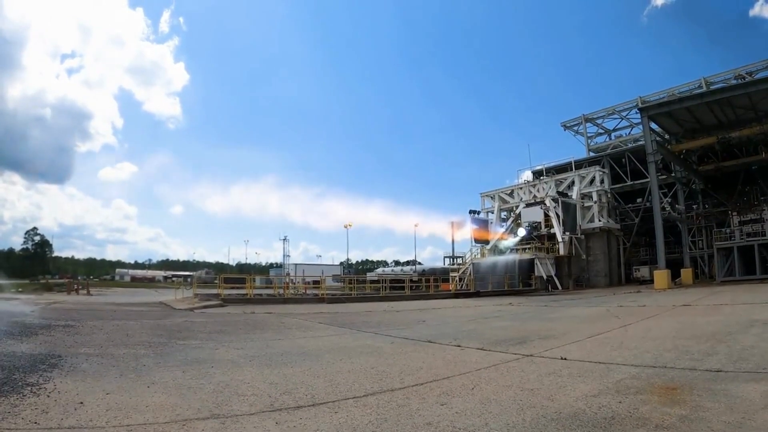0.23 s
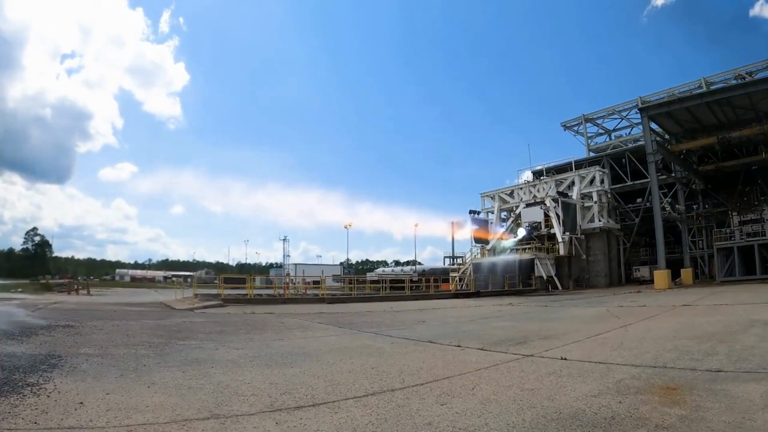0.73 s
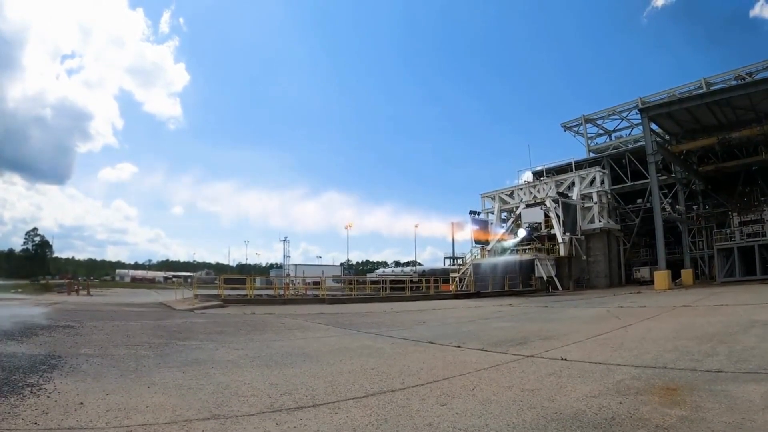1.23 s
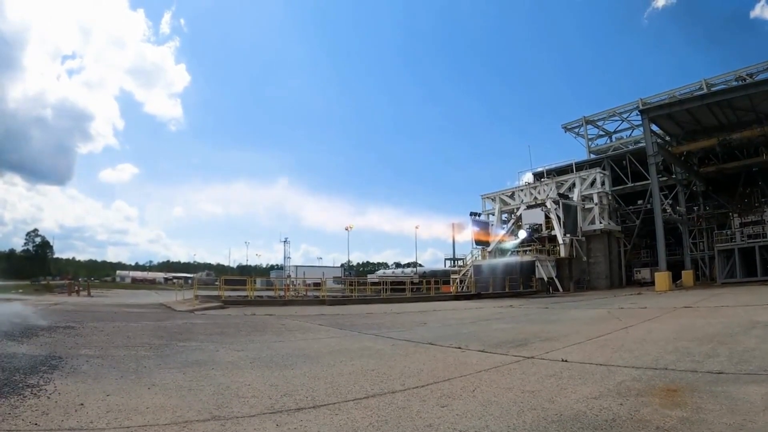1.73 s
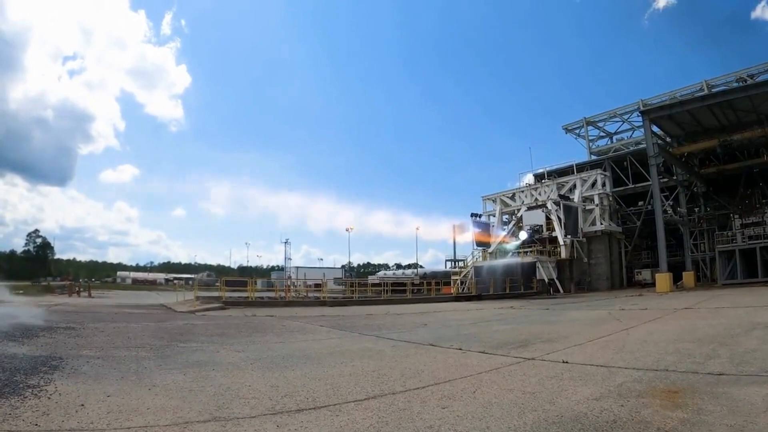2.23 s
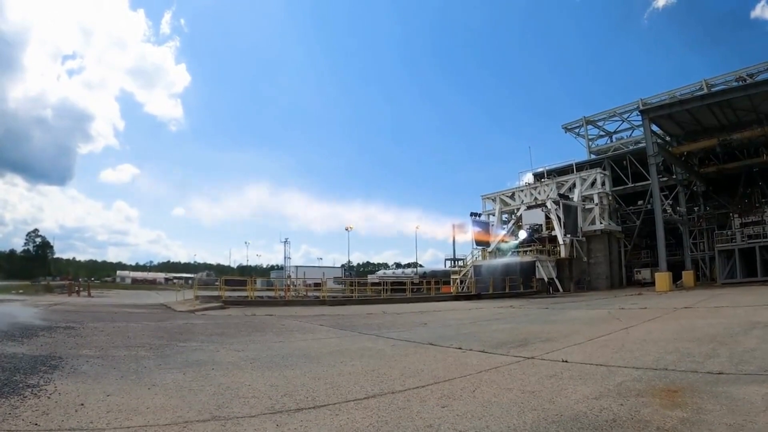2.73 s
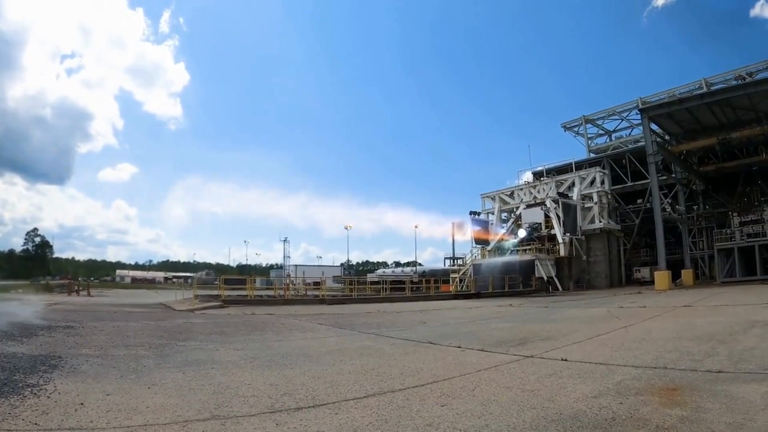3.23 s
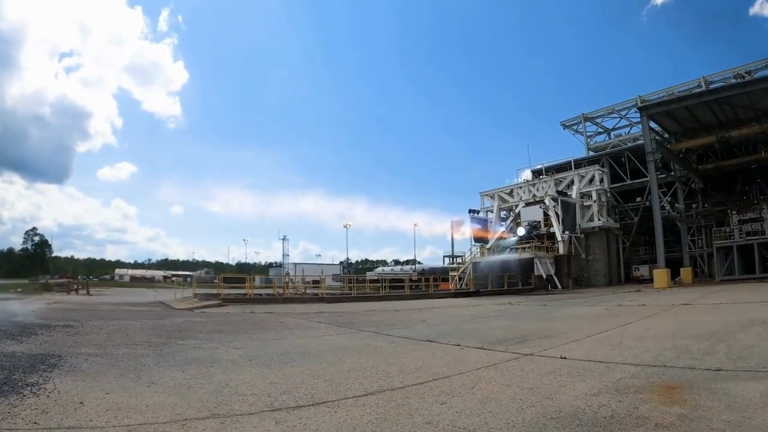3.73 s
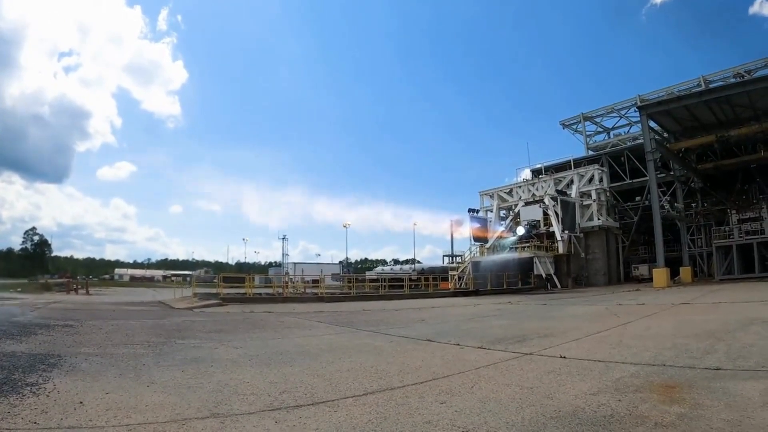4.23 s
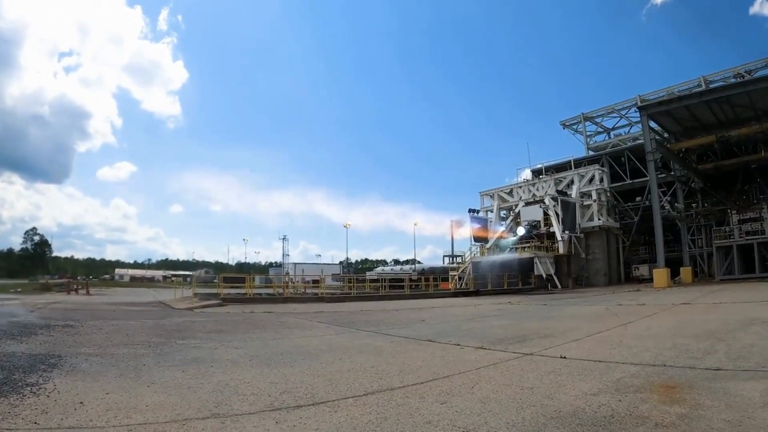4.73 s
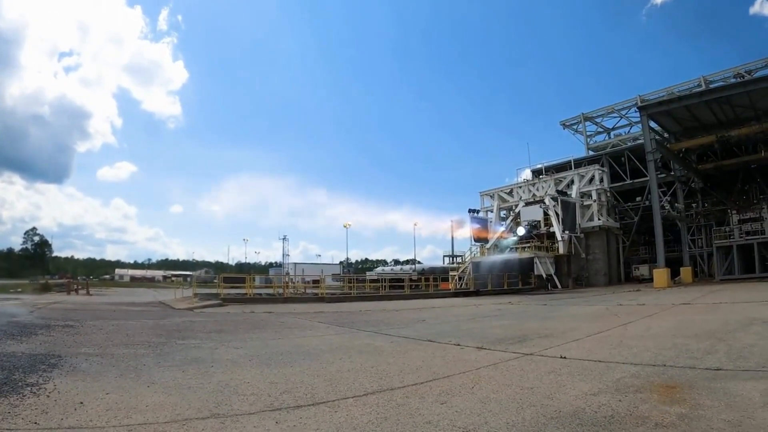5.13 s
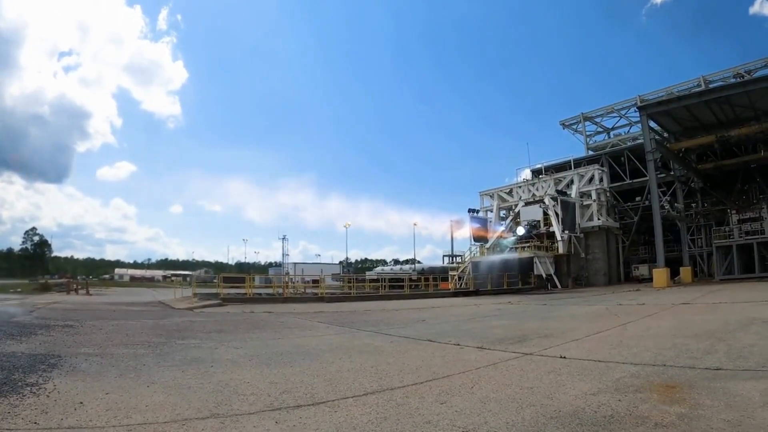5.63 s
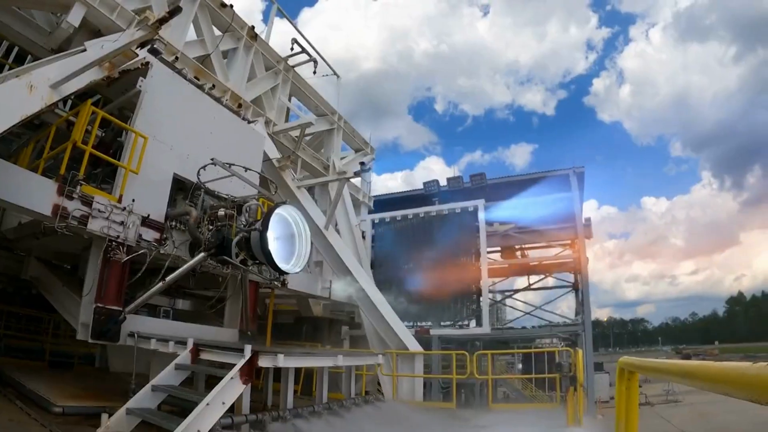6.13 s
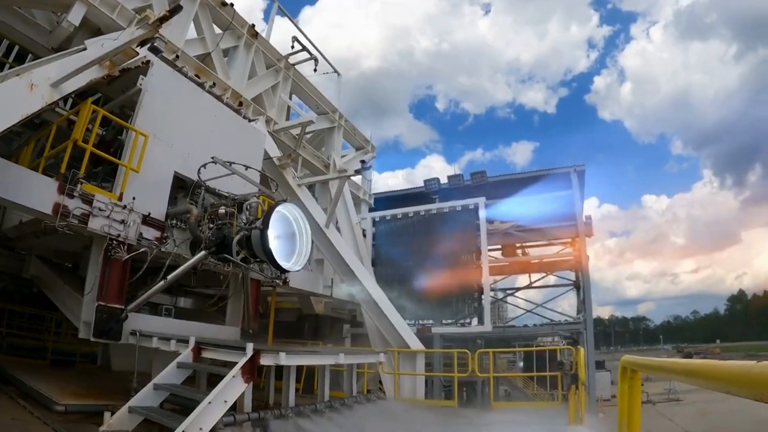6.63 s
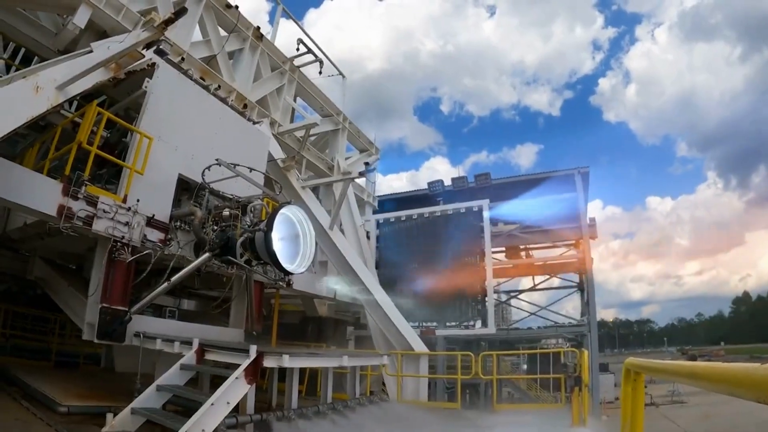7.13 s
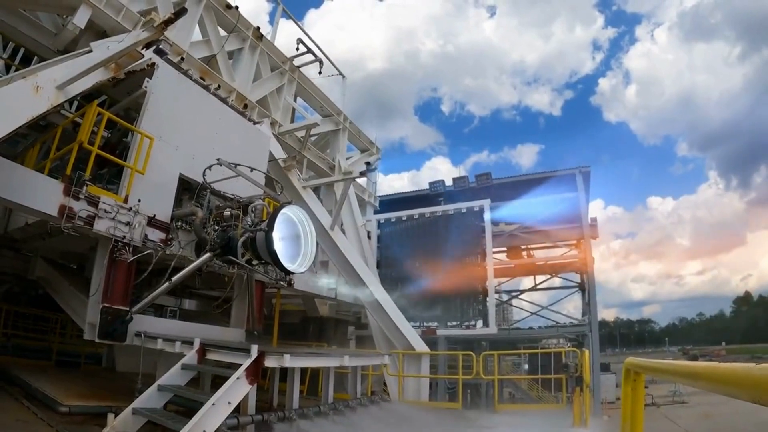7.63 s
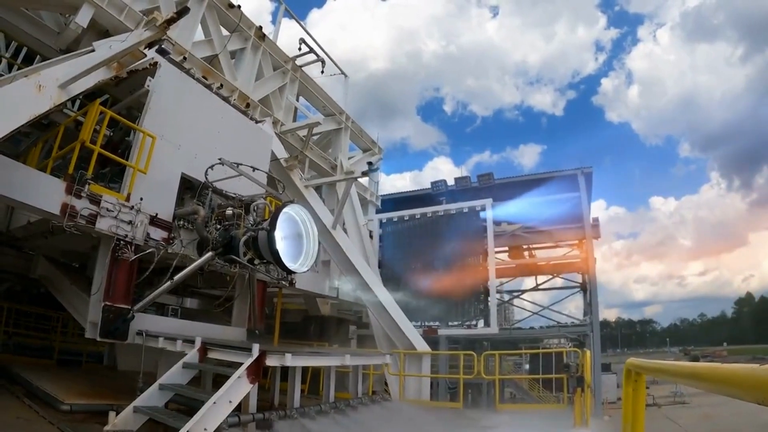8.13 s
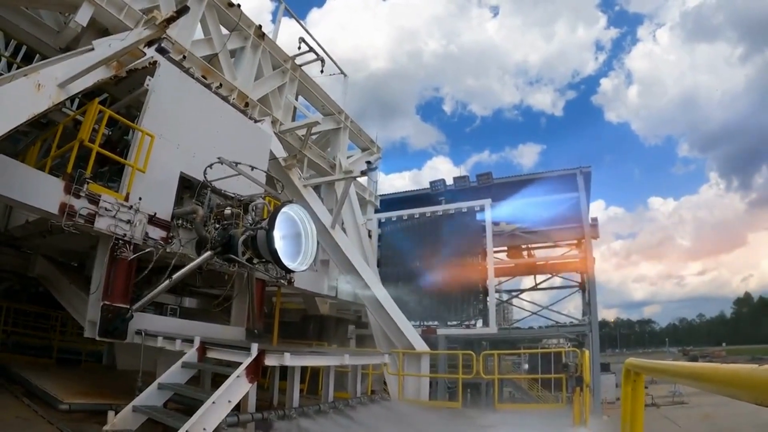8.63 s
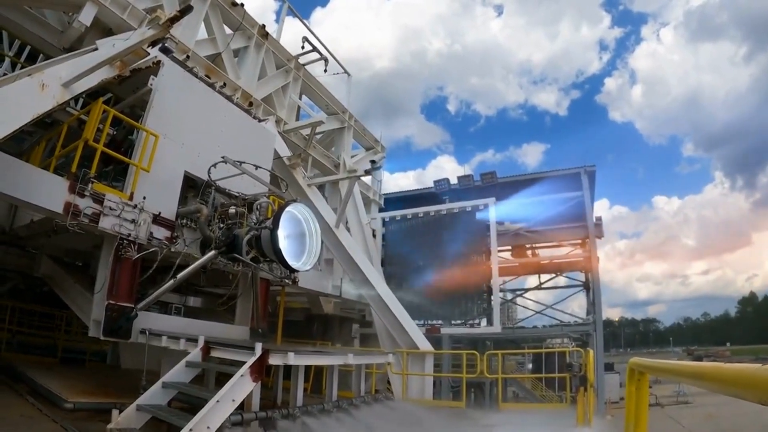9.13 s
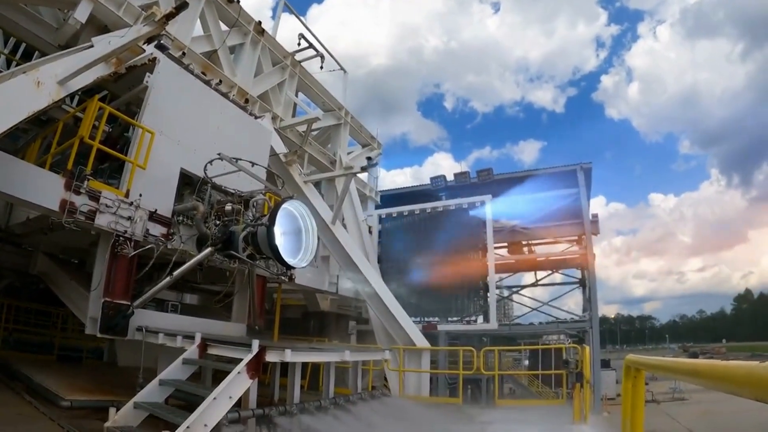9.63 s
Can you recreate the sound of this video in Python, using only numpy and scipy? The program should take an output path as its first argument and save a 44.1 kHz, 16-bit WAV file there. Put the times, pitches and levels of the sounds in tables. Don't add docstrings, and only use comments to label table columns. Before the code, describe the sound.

Unbroken rocket thrust outdoors, heard from two housed camera microphones. First, across a concrete apron, dense bassy thunder drives the microphone into distortion, its weak hiss fluttering in quick crackling bursts and lulls. At about 5.8 seconds the sound clicks and switches instantly to a near position: still deep, but with a full harsh rushing blast, even and dense, with little crackle and no fade.

```python
import sys
import numpy as np
from scipy import signal
from scipy.fft import rfft, irfft, next_fast_len
from scipy.io import wavfile
from scipy.ndimage import uniform_filter1d

SR = 44100
rng = np.random.default_rng(int(sys.argv[2]) if len(sys.argv) > 2 else 0)


def int16_out(signal):
    q = np.round(np.clip(np.atleast_2d(signal).T, -1, 1) * 32767)
    wavfile.write(sys.argv[1], SR, q.astype(np.int16))


def ratio(d):
    e = np.asarray(d, float) / 20
    return 10 ** e


N = 435708

CUT_S, CUT_JUMP = 5.83493, -.24
HISS_FROM_HZ = 1500
RUN_IN = 8192
FAR_LEVEL_DB, NEAR_LEVEL_DB = -11, -13.5
BURST_S, LULL_S = .018, .025
ROAR_FOLLOWS = 0.021
EDDIES_PER_S = 18.
CEILING_BAND_HZ, CEILING_RAGGED_HZ = 280, 800

# frequency [Hz], density [dB per Hz].
FAR_PLUME = [(20, -12), (80, -3.5), (200, -5), (500, -21.5), (1200, -35.5), (3000, -43.5), (6000, -54),
             (15000, -54.5)]
NEAR_PLUME = [(20, -9.5), (70, -12), (170, -4.5), (320, -22.5), (500, -31), (1300, -23.5), (3000, -13.5),
              (15000, -23.5)]
# frequency [Hz], density [dB per Hz].
FAR_HEARD = [(12, -45), (22, -17.5), (45, -5.5), (75, 0.5), (180, -2.5), (280, -7.5), (500, -10),
             (1000, -22), (1750, -35.5), (2500, -34.5), (3200, -42), (5200, -53.5), (8200, -70),
             (15600, -69)]
NEAR_HEARD = [(12, -35), (22, -14.5), (70, -2), (170, -2), (320, -5), (365, -9.5), (520, -14), (1250, -9.5),
              (2700, -14), (3450, -22.5), (3900, -31), (5500, -35.5), (8500, -59), (15600, -66)]
# centre [Hz], width [Hz], gain [dB].
FAR_CAVITY = [(4020, 860, 8), (6700, 700, 2.5), (12200, 600, 5), (13800, 1600, 2)]
NEAR_CAVITY = [(667, 39, 2), (797, 40, -2.5), (866, 25, 0.5), (2324, 156, -4.5), (10060, 1930, 6.5),
               (12350, 1000, -1)]
# frequency [Hz], lag [ms].
HOUSING_LAG = [(30, 1.7), (150, 2.4), (300, 1.8), (570, 1.36), (1100, .7), (2000, .25), (3500, 0)]
# time [s], swell [dB].
BURSTS = [(.07, 4), (.14, 5.5), (.61, 9.5), (.70, 13.5), (.92, 7.5), (1.15, 6), (1.27, 2.5), (1.37, 7),
          (1.53, -1), (1.80, 10), (1.91, 10), (1.97, 2.5), (2.22, 3), (2.30, 5), (2.36, 9.5), (2.48, 11),
          (2.81, 3.5), (3.00, 6.5), (3.13, 9), (3.26, 8), (3.31, 6.5), (3.67, 6), (3.92, 11), (4.07, 6),
          (4.32, 3), (4.47, 5), (4.60, 2.5), (4.67, 7), (5.02, 7.5), (5.77, 3.5)]
# time [s], sag [dB].
LULLS = [(.10, -7.5), (.53, -9.5), (.82, -7), (.98, -4), (1.46, -14.5), (1.86, -2), (2.02, -8),
         (2.53, -8.5), (2.68, -7), (2.74, -10), (2.84, -7), (3.07, -4.5), (3.39, -8), (3.61, -6),
         (3.98, -10), (4.22, -3), (4.54, -13), (4.75, -6), (4.90, -6), (4.99, -10.5), (5.22, -2),
         (5.40, -6.5), (5.66, -12.5), (5.73, -11.5)]
# frequency [Hz], power share [0-1].
CAMERA_BLUR = [(300, 0), (600, .15), (1100, .25), (2000, .07), (4000, .05), (6500, .55), (9000, .75)]
# low edge [Hz], high edge [Hz], chance [0-1].
FAR_STARVED = [(6900, 7600, .02), (7600, 8300, .05), (8300, 8900, .09), (8900, 9600, .03),
               (9600, 10300, .04), (10300, 11200, .04)]
NEAR_STARVED = [(9900, 10600, .1), (10600, 11200, .68), (11300, 11600, .45), (11600, 11900, .4),
                (11900, 12300, .3), (12300, 12700, .2)]
# time [s], ceiling [Hz].
FAR_CEILING = [(0, 15900)]
NEAR_CEILING = [(5.84, 13500), (6.6, 14000), (7.2, 13000), (7.7, 13600), (8.1, 14900), (8.5, 13600),
                (8.7, 12600), (9.0, 13500)]
# frequency [Hz], level [dB rms].
WHINE = [(11254, -86)]


def rms_one(x):
    return x / np.sqrt(np.mean(x ** 2))


def at_hz(points, hz):
    point_hz, value = np.transpose(points)
    return np.interp(np.log(np.maximum(hz, 1)), np.log(point_hz), value)


def gusts(events, half_s, first, count):
    at = np.arange(0, count, 64)
    t = (first + at) / SR
    bells = np.zeros(len(t))
    for s, db in events:
        bells += db * np.exp(-((t - s) / half_s) ** 2)
    return np.interp(np.arange(count), at, bells)


def drift(rate_hz, count):
    r = np.exp(-2 * np.pi * rate_hz / SR)
    noise = rng.standard_normal(count + SR)
    return rms_one(signal.lfilter([1], [1, -2 * r, r * r], noise)[SR:])


def shocklets(per_s, decay_ms, count):
    size_db = 4.6 * np.minimum(rng.exponential(1, count), 4)
    jumps = (rng.random(count) < per_s / SR) * ratio(size_db)
    sag = np.exp(-1000 / (decay_ms * SR))
    return rms_one(signal.lfilter([1], [1, -sag], jumps - jumps.mean()))


def plume(spectrum, gust_db, crackle_db):
    count = len(gust_db)
    hz = np.arange(count // 2 + 1) * SR / count
    noise = rfft(rng.standard_normal(count)) * ratio(at_hz(spectrum, hz))
    rumble = irfft(noise * (hz <= HISS_FROM_HZ), count)
    hiss = irfft(noise * (hz > HISS_FROM_HZ), count)
    crackle = ratio(crackle_db) * np.std(hiss) * shocklets(per_s=350., decay_ms=0.11, count=count)
    return rms_one(rumble + ratio(gust_db) * (hiss + crackle))


def steepen(pressure, steepen_ms):
    at = np.arange(len(pressure))
    return np.interp(at + pressure * steepen_ms * SR / 1000, at, pressure)


def capsule(pressure, drive, lean, knee):
    swing = drive * pressure + lean
    return swing / (1 + np.abs(swing) ** knee) ** (1 / knee)


def housing(x, heard, cavity):
    hz, power = signal.welch(x, SR, nperseg=4096)
    edges = np.geomspace(15, SR / 2, 40)
    sums = np.interp(edges, hz, np.cumsum(power))
    centres = np.sqrt(edges[1:] * edges[:-1])
    own_db = np.c_[centres, 10 * np.log10(np.diff(sums) / np.diff(edges))]

    hz = np.arange(len(x) // 2 + 1) * SR / len(x)
    gain_db = at_hz(heard, hz) - at_hz(own_db, hz)
    for centre, width, db in cavity:
        gain_db += db * np.exp(-((hz - centre) / width) ** 2)
    lag_s = at_hz(HOUSING_LAG, hz) / 1000
    phase = np.pi / 2 - 2 * np.pi * np.cumsum(lag_s) * hz[1]
    return irfft(rfft(x) * ratio(gain_db) * np.exp(1j * phase), len(x))


def gain_control(x, top):
    held = uniform_filter1d(np.abs(x), size=400)
    return x / np.sqrt(1 + (held / top) ** 2)


def camera_smear(x, starved, ceiling, start_s):
    hz, s, frames = signal.stft(x, SR, nperseg=2048)
    share = np.clip(at_hz(CAMERA_BLUR, hz), 0, 1)[:, None]
    power = np.abs(frames) ** 2
    steady = np.median(power, axis=1, keepdims=True) / np.log(2)
    height = np.sqrt(0.16 * power + 0.28 * steady)
    turns = np.exp(2j * np.pi * rng.random(frames.shape))
    frames = np.sqrt(1 - share) * frames + np.sqrt(2 * share) * height * turns

    for low_hz, high_hz, chance in starved:
        dropped = np.repeat(rng.random(len(s)) < chance, 2)[:len(s)]
        frames[np.ix_((hz > low_hz) & (hz <= high_hz), dropped)] = 0

    band = (hz // CEILING_BAND_HZ).astype(int)
    ragged = np.repeat(rng.standard_normal((band[-1] + 1, len(s))), 2, axis=1)[band, :len(s)]
    reach_hz = np.interp(start_s + s, *np.transpose(ceiling)) + CEILING_RAGGED_HZ * ragged
    frames[(band * CEILING_BAND_HZ)[:, None] > reach_hz] = 0
    return signal.istft(frames, SR, nperseg=2048)[1][:len(x)]


def listening_post(first, count, level_db, spectrum, heard, cavity, starved, ceiling, crackle_db,
                   steepen_ms, drive, lean, knee, flutter_db, eddy_db, top):
    size = next_fast_len(count + 2 * RUN_IN)
    start = first - RUN_IN
    swell_db = gusts(BURSTS, BURST_S, start, size) + gusts(LULLS, LULL_S, start, size)
    flutter = drift(120, size)
    flutter = flutter - .7 * uniform_filter1d(flutter, size=2000)
    gust_db = .8 * swell_db + flutter_db * flutter + eddy_db * drift(EDDIES_PER_S, size)

    pressure = steepen(plume(spectrum, gust_db, crackle_db), steepen_ms)
    swing = capsule(pressure, drive, lean, knee)
    housed = rms_one(housing(swing, heard, cavity))
    taken = rms_one(camera_smear(gain_control(housed, top), starved, ceiling, start / SR))
    roar = ratio(level_db + ROAR_FOLLOWS * swell_db) * taken
    return roar[RUN_IN:RUN_IN + count]


def cut_click(step, t):
    return step * np.exp(-t / .0006)


def recorder_whine(t):
    return sum(ratio(db) * np.sqrt(2) * np.sin(2 * np.pi * hz * t) for hz, db in WHINE)


def scene():
    cut = round(CUT_S * SR)
    far = listening_post(
        0, cut, FAR_LEVEL_DB, FAR_PLUME, FAR_HEARD, FAR_CAVITY, FAR_STARVED, FAR_CEILING,
        crackle_db=3.5, steepen_ms=0.23, drive=5.5, lean=0.069, knee=2.5,
        flutter_db=5.0, eddy_db=1.27, top=1.6)
    near = listening_post(
        cut, N - cut, NEAR_LEVEL_DB, NEAR_PLUME, NEAR_HEARD, NEAR_CAVITY, NEAR_STARVED, NEAR_CEILING,
        crackle_db=-26.5, steepen_ms=.005, drive=0.99, lean=0.022, knee=9.3,
        flutter_db=0.14, eddy_db=0.7, top=1.0)
    t = np.arange(N - cut) / SR
    near = near + cut_click(far[-1] + CUT_JUMP - near[0], t) + recorder_whine(t)
    return np.r_[far, near][None]


def top_cut(x):
    return signal.sosfilt(signal.butter(12, 15830, fs=SR, output="sos"), x)


def record(dry):
    return top_cut(dry)


dry = scene()
out = record(dry)
int16_out(out)
```